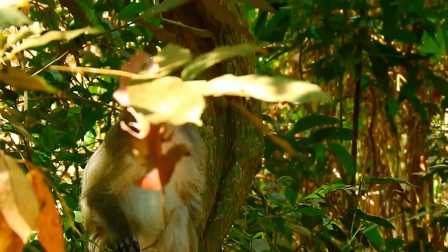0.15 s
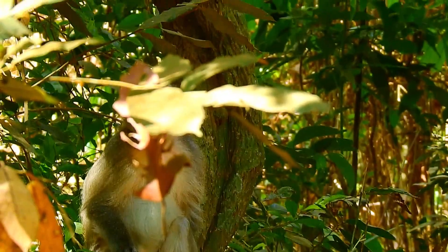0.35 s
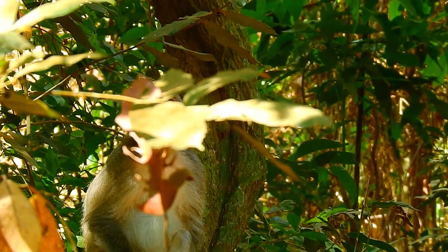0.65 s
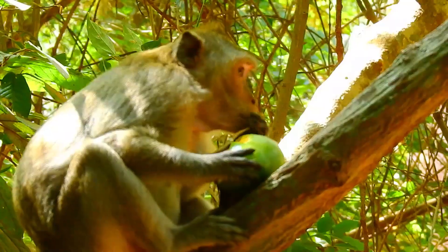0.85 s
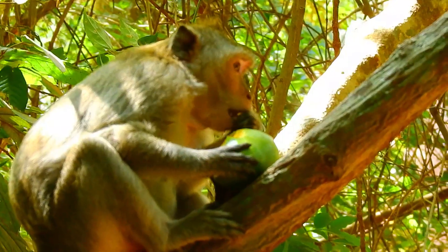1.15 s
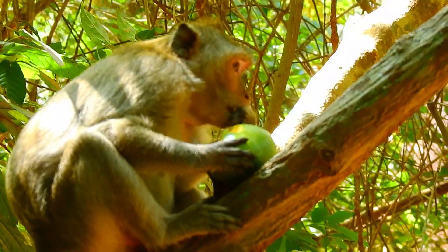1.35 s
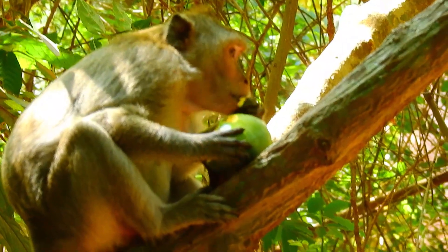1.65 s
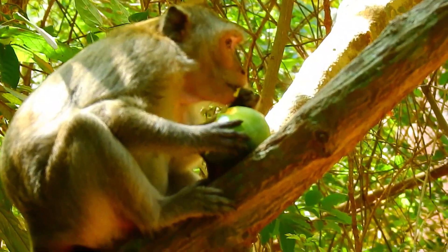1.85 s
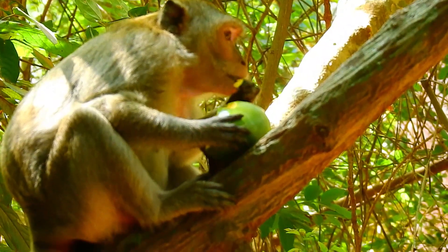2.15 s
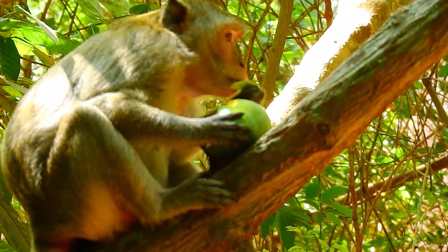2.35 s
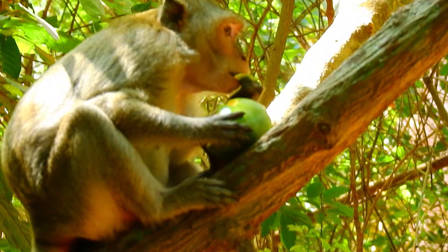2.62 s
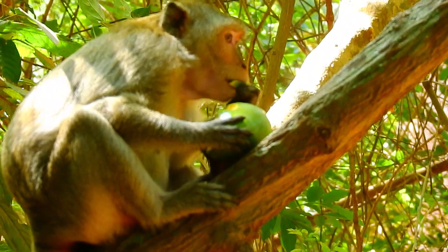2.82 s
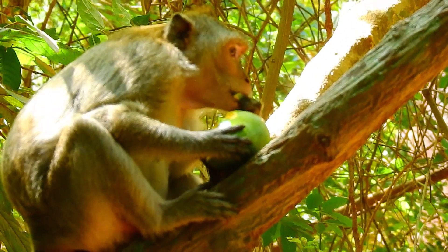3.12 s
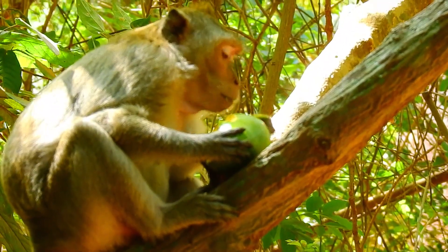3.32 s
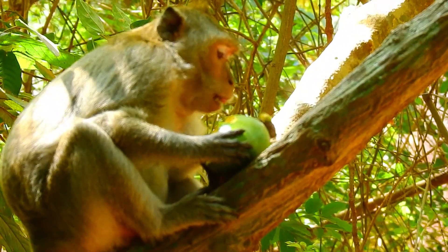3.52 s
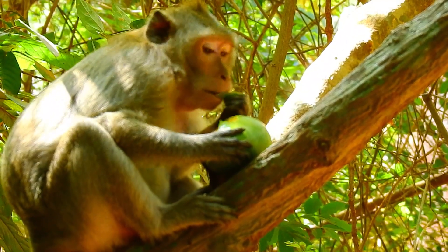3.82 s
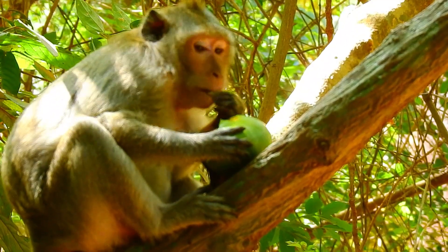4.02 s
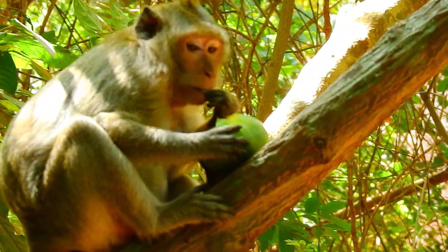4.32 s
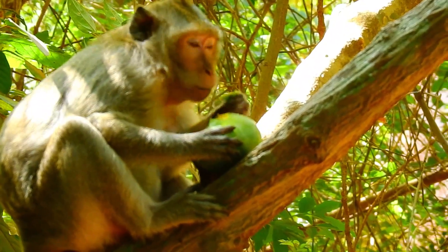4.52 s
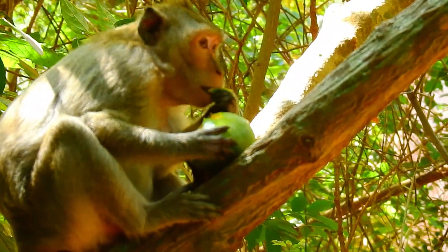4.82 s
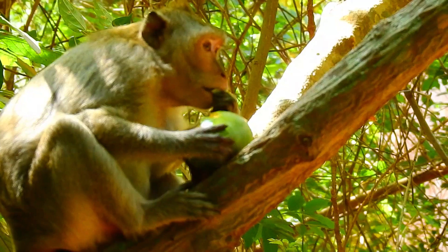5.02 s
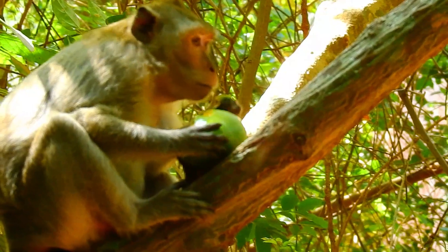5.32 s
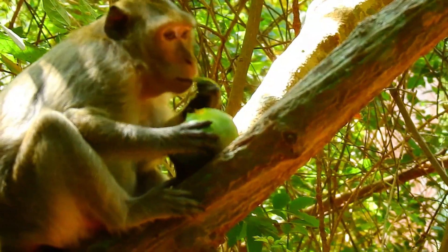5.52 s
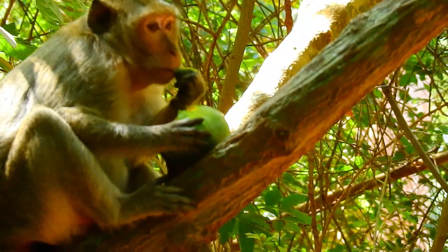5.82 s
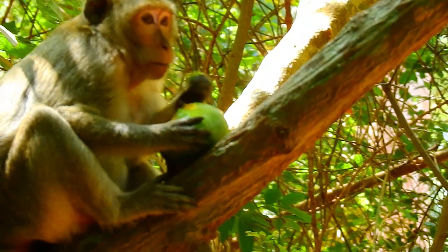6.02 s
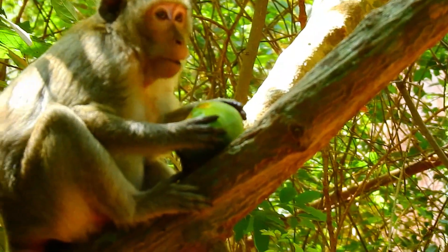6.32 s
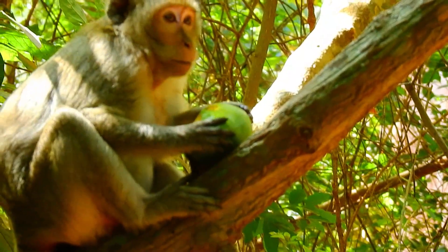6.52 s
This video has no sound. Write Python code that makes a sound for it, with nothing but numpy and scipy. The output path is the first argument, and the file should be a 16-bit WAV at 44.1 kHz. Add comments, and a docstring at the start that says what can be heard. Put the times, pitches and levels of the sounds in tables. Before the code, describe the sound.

Dense high cicada drone over a low chugging rumble of passing engines; sound drops out briefly early, then far-off bird calls and dull knocks close it.

```python
"""Cicada forest with passing diesels

Noise shaped into a band makes a cicada chorus; nearer cicadas buzz as combs of lines or hold gliding tones.
Firing pulses ring the exhausts of two slow single-cylinder diesels on a track beyond the trees.
Filtered noise makes wheels, foliage and rustles; far-off fowl give two-harmonic notes, mostly near the end,
where a few damped sines knock. Early on, the sound cuts out for half a second.
"""
import sys
import numpy as np
from scipy import signal
from scipy.fft import rfft, irfft
from scipy.io import wavfile
from scipy.ndimage import uniform_filter1d

SR = 44100
rng = np.random.default_rng(int(sys.argv[2]) if len(sys.argv) > 2 else 0)


def output_pcm(signal):
    """Save a mono or channel-first signal as 16-bit PCM at the path in sys.argv[1].

    Samples are clipped to [-1, 1] before scaling.
    """
    pcm = np.clip(np.atleast_2d(signal).T, -1, 1) * 32767
    wavfile.write(sys.argv[1], SR, np.round(pcm).astype(np.int16))


N = 293706
TIME = np.arange(N) / SR
HZ = np.fft.rfftfreq(N, 1 / SR)

# likeness of left and right: frequency_hz, likeness (-1 to 1)
SAME = [(100, 1), (400, .96), (1200, 0.9), (2500, 0.78), (3800, 0.58), (5000, 0.3), (6200, -0.058),
        (7100, -0.16), (7550, 0.064), (8100, -0.33), (13000, -0.21)]
# silent break: start_s, end_s
GAP_S = (.2405, .7368)


def gain_of(db):
    """Decibels to amplitude."""
    return 10 ** (np.asarray(db) / 20)


def evened(x):
    """Scales to rms 1."""
    return x / np.sqrt(np.mean(x ** 2) + 1e-20)


def read(points, hz):
    """Interpolates a table of values on a log-frequency axis."""
    f, value = np.transpose(points)
    return np.interp(np.log(hz + 1), np.log(f + 1), value)


def curve(rows):
    """A time table at every sample."""
    return np.interp(TIME, *np.transpose(rows))


def drift(rate_hz):
    """Random wander of rms 1: noise low-passed around rate_hz."""
    return evened(irfft(rfft(rng.standard_normal(N)) / (1 + (HZ / rate_hz) ** 4), N))


def noise(gain, same):
    """Stereo noise of rms 1 with a given spectrum and left-right likeness."""
    mid, side = rfft(rng.standard_normal((2, N))) * gain
    same = np.clip(same, -1, 1)
    mid = mid * np.sqrt(1 + same)
    side = side * np.sqrt(1 - same)
    return evened(irfft(np.array([mid + side, mid - side]), N))


def air(spectrum):
    """Diffuse noise of rms 1 that arrives from all around."""
    return noise(gain_of(read(spectrum, HZ)), read(SAME, HZ))


def arch_of(start_s, length_s):
    """Half a sine cycle over an event, 0 outside it."""
    return abs(np.sin(np.pi * np.clip((TIME - start_s) / length_s, 0, 1)))


def forest(x, t60_s, wet_db):
    """Trunks and leaves scatter a sound into a decaying tail, much alike on both sides."""
    tail = noise(1, 0.92)[:, :SR] * gain_of(-60 * TIME[:SR] / t60_s)
    tail = tail / np.linalg.norm(tail[0])
    return x + gain_of(wet_db) * signal.fftconvolve(x[None], tail, axes=1)[:, :N]


def passing(nearest_s, half_power_s):
    """Level in dB of a source that moves past on a straight line: it falls with distance."""
    return -10 * np.log10(1 + ((TIME - nearest_s) / half_power_s) ** 2)


def hump(center_s, half_s):
    """A smooth swell of height 1, down to 1/e at half_s from its center."""
    return np.exp(-((TIME - center_s) / half_s) ** 2)


def foliage():
    """A faint hush of leaves as wavering noise, quieter before the break."""
    # relative spectrum: frequency_hz, density_db_per_hz
    leaves = [(200, -14), (600, -11.5), (1500, 2), (2200, 2.5), (2900, 3), (5000, -7), (10000, -28),
              (15500, -35.5)]
    level_db = np.where(TIME < GAP_S[0], -52, -45)
    return air(leaves) * gain_of(level_db + 2.3 * drift(12.0))


def bouts():
    """How far the nearer cicadas, which sing together, have risen above their rest, in dB."""
    # bouts of song: start_s, end_s, rise_db
    bout_rows = [(1.15, 4.3, 5), (5.45, 7.208, 5)]
    edge_s = .2
    rise_db = 0
    for start_s, end_s, db in bout_rows:
        rise_db = rise_db + db * (np.tanh((TIME - start_s) / edge_s) - np.tanh((TIME - end_s) / edge_s)) / 2
    return rise_db


def cicadas():
    """Many tymbals blur into a noise band with an uneven spectrum; narrow peaks are the shrillest singers."""
    # relative spectrum of the chorus: frequency_hz, density_db_per_hz
    chorus_spectrum = [(2800, -31), (4900, -11.5), (5450, -11.5), (6050, -3.5), (6500, -7.5), (6880, -1.5),
                       (7350, -2.5), (7650, -6), (7830, -10), (8200, -12), (8700, -20.5), (10000, -30.5),
                       (11600, -32.5), (12400, -41), (15500, -44)]
    # shrillest singers: center_hz, half_width_hz, level_db, left_right_likeness
    singer_rows = [(6800, 12, -41.5, 0.059), (6940, 35, -39, -.1), (7050, 31, -36.5, 0),
                   (6890, 25, -41.5, -.3), (7260, 45, -37, -.4), (7450, 28, -38, .3), (7460, 28, -40.5, 0),
                   (7590, 55, -35, 0.286), (7800, 12, -48, .3), (7700, 16, -40.5, .4)]
    start_db, growth_db_per_s, db_per_bout_db = -27, 0.2451, 0.06
    # random ripple along frequency
    ripple = uniform_filter1d(rng.standard_normal(len(HZ)), size=110)
    ripple = evened(uniform_filter1d(ripple, size=70))
    chorus = noise(gain_of(read(chorus_spectrum, HZ)) * gain_of(1.2 * ripple), read(SAME, HZ))
    chorus = chorus * gain_of(0.33 * drift(60))
    chorus = chorus * gain_of(start_db + growth_db_per_s * TIME + db_per_bout_db * bouts())
    singers = np.zeros((2, N))
    for hz, half_width_hz, db, same in singer_rows:
        singers += gain_of(db) * noise(1 / (1 + ((HZ - hz) / half_width_hz) ** 2), same)
    return chorus + singers


def buzzers():
    """Regular tymbal clicks give a comb of lines gliding together; leaves make each flutter, unlike per side."""
    # nearer cicadas, one value each: mean click_rate_hz
    tymbal_hz = [169.06, 196.4, 236.1, 289.6]
    # relative ring of the tymbals: frequency_hz, gain_db
    ring = [(2600, -33.5), (3200, -9.5), (3600, -4), (4300, -3.5), (4800, -0.5), (5500, -0.5), (6200, -7.5),
            (7000, -20.5), (8000, -30)]
    rest_db = -39
    out = np.zeros((2, N))
    # complex flutter: one row for mid, one for side
    flutter = np.array([drift(7.2) + 1j * drift(13.0), drift(7.8) + 1j * drift(7)])
    for rate_hz in tymbal_hz:
        turn = np.exp(2j * np.pi * np.cumsum(rate_hz * (1 + .007 * drift(.35))) / SR)
        orders = np.arange(round(3000 / rate_hz), round(7000 / rate_hz))
        line = turn ** orders[0]
        for order in orders:
            line_hz = order * rate_hz
            same = np.clip(read(SAME, line_hz), -1, 1)
            fluttering = (line * np.roll(flutter, rng.integers(N), axis=1)).real
            mid, side = gain_of(read(ring, line_hz)) * fluttering
            out += mid * np.sqrt(1 + same) + np.outer([1, -1], side * np.sqrt(1 - same))
            line = line * turn
    return evened(out) * gain_of(rest_db + bouts())


def diesel(firing_hz, first_turn, thud, uneven_db, jitter_turns):
    """One blow per firing, each a little different, rings the exhaust; scaled to rms 1."""
    turns = np.cumsum(firing_hz) / SR + first_turn + jitter_turns * drift(9)
    firings = np.diff(np.floor(turns), prepend=np.floor(turns[0]))
    blows = firings * gain_of(uneven_db * drift(14))
    # minimum phase: the ring starts at the blow
    log_gain = np.log(gain_of(read(thud, abs(np.fft.fftfreq(N, 1 / SR)))))
    causal = np.exp(np.conj(signal.hilbert(log_gain)))[:len(HZ)]
    return evened(irfft(rfft(blows) * causal, N))


def engines():
    """Two diesels pass slowly, with diffuse ground rumble; all fainter before the break."""
    # relative spectra of one exhaust thud, after its way through the trees: frequency_hz, gain_db
    near_thud = [(26, -52), (38, -18.5), (50, -8), (75, -14.5), (100, -6), (126, 2), (151, 1.5),
                 (177, -5.5), (202, -13), (260, -34), (380, -30), (800, -70.5)]
    far_thud = [(20, -57), (37, -32), (56, -20.5), (75, -7), (93, 4.5), (112, 2.5), (131, 1.5), (168, -10),
                (230, -21.5), (500, -67.5)]
    # far diesel, slowing at the end: time_s, firing_rate_hz
    far_speed = [(.8, 18.7), (3.5, 17.6), (4.8, 17.5), (5.65, 18), (6.45, 15.7)]
    # relative ground rumble: frequency_hz, density_db_per_hz
    rumble_spectrum = [(15, -41), (30, -30.5), (50, -1.5), (90, 5.5), (140, 3.5), (200, 0), (290, -11),
                       (370, -25), (800, -55)]
    # brief swells of the near thudding: center_s, rise_db
    surges = [(3.82, 3.5), (4.3, 3.5), (4.88, 7)]
    surge_half_s = 0.12
    # the near diesel eases from start_hz towards idle_hz
    start_hz, idle_hz, settle_s = 26.453, 23.629, 7.671
    near_db, far_db, early_db = -31, -34.5, -7.5

    near_hz = idle_hz + (start_hz - idle_hz) * np.exp(-TIME / settle_s)
    swell_db = passing(nearest_s=4.15, half_power_s=1.63)
    swell_db = swell_db + sum(db * hump(center_s, surge_half_s) for center_s, db in surges)
    near = diesel(near_hz, .86, near_thud, uneven_db=1.46, jitter_turns=0.012)
    near = near * gain_of(near_db + swell_db)
    far = diesel(curve(far_speed), 0.302, far_thud, uneven_db=1.0, jitter_turns=0.014)
    far = far * gain_of(far_db + passing(nearest_s=4.2, half_power_s=2.4))
    rumble = air(rumble_spectrum) * gain_of(-35.5 + 0.29 * swell_db)
    return (near + far + rumble) * gain_of(early_db * (TIME < GAP_S[0]))


def wheels():
    """Rolling wheels: broad hiss and roaring noise bands swell as they come near, and on rough stretches."""
    # relative broad hiss: frequency_hz, density_db_per_hz
    hiss_spectrum = [(150, -22), (350, -2), (550, 1.5), (750, -14.5), (1100, 2.5), (1900, 5.5), (2700, 0.5),
                     (4000, -4), (8000, -44.5)]
    # roaring bands: center_hz, width_hz, relative level_db, gain_db_per_db of rolling
    roar_bands = [(584, 236, -5.5, 0.63), (1000, 256, -5.5, 1.5), (1260, 430, -9.5, 1),
                  (1533, 150, -13, 2.06)]
    # rough stretches: center_s, half_length_s, rise_db, most_raised_hz
    rough_patches = [(2.955, 0.56, 5.5, 690), (3.656, 0.24, 5.5, 570), (4.194, 0.4, 7, 1360),
                     (5.34, 0.34, 4, 1150)]
    patch_octaves, roll_db, early_db = 1.57, -39.5, -14

    def rough_db(hz):
        """Rise on rough stretches, less with distance in pitch."""
        total_db = 0
        for center_s, half_s, db, at_hz in rough_patches:
            share = np.exp(-(np.log2(hz / at_hz) / patch_octaves) ** 2)
            total_db = total_db + db * hump(center_s, half_s) * share
        return total_db

    swell_db = passing(nearest_s=5.56, half_power_s=2.94) + 1.2 * drift(21)
    out = air(hiss_spectrum) * gain_of(swell_db + rough_db(hz=1500) - 7)
    for hz, width_hz, db, follow in roar_bands:
        band = noise(1 / (1 + (2 * (HZ - hz) / width_hz) ** 4) ** .5, read(SAME, HZ))
        out += band * gain_of(db + follow * swell_db + rough_db(hz) + 1.7 * drift(12))
    return out * gain_of(roll_db + early_db * (TIME < GAP_S[0]))


def birds():
    """Fowl: notes with a strong second harmonic, arched and rough when hoarse, smeared by distance."""
    # notes: start_s, length_s, pitch_hz, second_harmonic_db before the tail, hoarseness (0 to 1)
    note_rows = [(-.02, 0.082, 1058, -49, .1), (4.307, 0.21, 520, -40, .4), (5.363, .14, 743.4, -35, 0.6),
                 (5.519, 0.24, 743, -38.5, .7), (5.623, 0.25, 810, -33.5, .9), (5.858, 0.2, 801, -32, 0.89),
                 (5.998, 0.258, 809, -31, 0.98), (6.167, 0.33, 780.6, -36.5, 0.57),
                 (6.45, 0.27, 786.7, -32, .3)]
    # fundamental against the second harmonic, at hoarseness 0 and 1
    clear_db, hoarse_db = -23.5, -6
    arch_share = .04
    out = np.zeros(N)
    jitter = .014 * drift(60) + .011 * drift(12)
    rasp_db = 4 * drift(45)
    for start_s, length_s, hz, db, hoarse in note_rows:
        arch = arch_of(start_s, length_s)
        pitch_hz = hz * (1 + hoarse * (jitter - arch_share * (1 - arch)))
        phase = 2 * np.pi * np.cumsum(pitch_hz) / SR
        swell = np.sqrt(arch) * evened(gain_of(hoarse * rasp_db))
        fundamental_db = clear_db + hoarse * (hoarse_db - clear_db)
        tone = np.sin(2 * phase) + gain_of(fundamental_db) * np.sin(phase)
        out += gain_of(db) * swell * tone
    return forest(out, t60_s=0.75, wet_db=-1.5)


def whines():
    """The nearest cicadas each hold one gliding sine, which flutters on its way through the leaves."""
    # whines: start_s, length_s, middle_hz, glide_hz_per_s, level_db
    whine_rows = [(.7, .4, 3535, 40, -46), (1.05, .65, 4770, 130, -43), (1.28, .34, 3960, 0, -42),
                  (2.15, .7, 3778, 65, -40), (2.65, .37, 4575, 40, -39.5), (3.47, .26, 3985, -5, -41),
                  (3.85, .6, 3985, -5, -46), (5.35, .65, 3982, -37, -42), (5.3, 1.1, 4240, -170, -43),
                  (5.7, .36, 4580, -180, -39)]
    out = np.zeros((2, N))
    flutter = gain_of(2.8 * drift(25))
    waver = 0.0016 * drift(41)
    for start_s, length_s, middle_hz, glide_hz_per_s, db in whine_rows:
        shift = rng.integers(N)
        left_lead_rad = rng.normal(-0.11, 0.39)
        glide_hz = glide_hz_per_s * (TIME - start_s - length_s / 2)
        pitch_hz = (middle_hz + glide_hz) * (1 + np.roll(waver, shift))
        phase = 2 * np.pi * np.cumsum(pitch_hz) / SR
        swell = np.sqrt(arch_of(start_s, length_s)) * np.roll(flutter, shift)
        out += gain_of(db) * swell * np.sin(phase + np.array([[left_lead_rad], [0]]))
    return out


def rustles():
    """Dry leaves brushing each other: short grainy puffs of band noise."""
    # puffs: center_s, length_s (between 1/e points), center_hz, width_hz, level_db
    puff_rows = [(1.703, 0.027, 1700, 500, -39.5), (3.148, 0.11, 2240, 1400, -40),
                 (4.09, .03, 1300, 1200, -32), (4.287, 0.023, 1500, 1500, -37),
                 (6.482, 0.069, 6400, 3240, -27.5)]
    out = np.zeros((2, N))
    grain = evened(gain_of(4.7 * drift(300)))
    for center_s, length_s, hz, width_hz, db in puff_rows:
        puff = noise(1 / (1 + (2 * (HZ - hz) / width_hz) ** 2), read(SAME, HZ))
        out += gain_of(db) * puff * grain * hump(center_s, length_s / 2)
    return out


def bumps():
    """Dull knocks: quickly damped sines."""
    # knocks: start_s, pitch_hz, decay_s, level_db
    knock_rows = [(6.348, 85, 0.016, -23), (6.457, 212, 0.0074, -18.5), (6.471, 112, .01, -24)]
    out = np.zeros(N)
    for start_s, hz, decay_s, db in knock_rows:
        t = np.maximum(TIME - start_s, 0)
        out += gain_of(db) * np.sin(2 * np.pi * hz * t) * np.exp(-t / decay_s)
    return out


def scene():
    """Everything in the forest; track and birds sit slightly to the right."""
    pan_db = [[-.2], [.2]]
    distant = (engines() + wheels() + birds()) * gain_of(pan_db)
    return distant + foliage() + rustles() + cicadas() + buzzers() + whines() + bumps()


def record(dry):
    """The sound drops out once, with short ramps; then a steep low-pass limits the band."""
    edge_hz = 15700
    live = 1. * ((TIME < GAP_S[0]) | (TIME > GAP_S[1]))
    live = uniform_filter1d(live, size=24)
    lowpass = signal.firwin(511, edge_hz, window=("kaiser", 9), fs=SR)
    return signal.oaconvolve(dry * live, lowpass[None], "same")


dry = scene()
out = record(dry)
output_pcm(out)
```